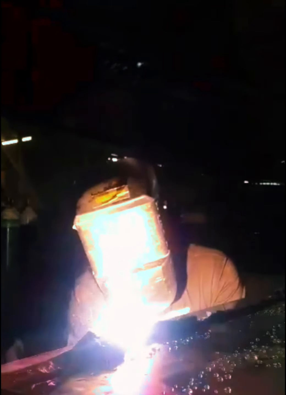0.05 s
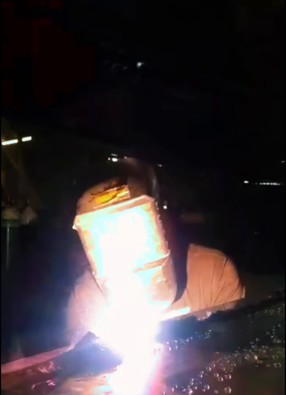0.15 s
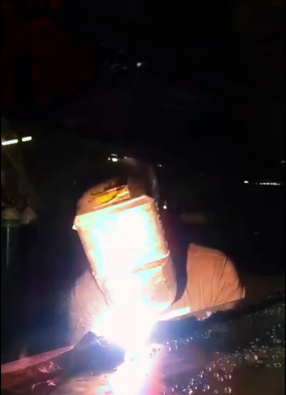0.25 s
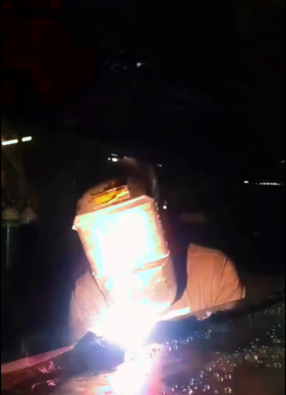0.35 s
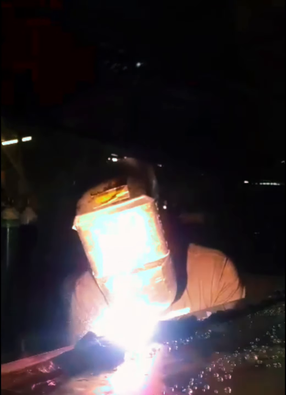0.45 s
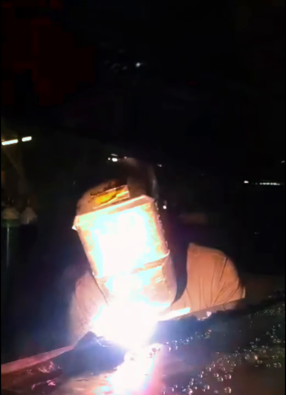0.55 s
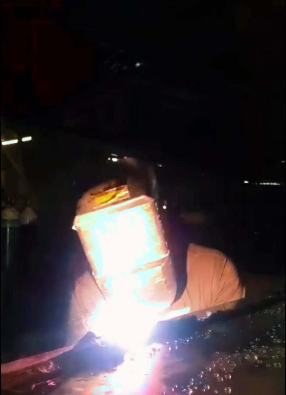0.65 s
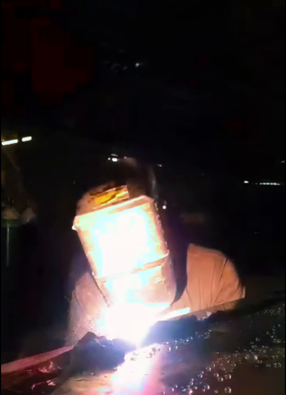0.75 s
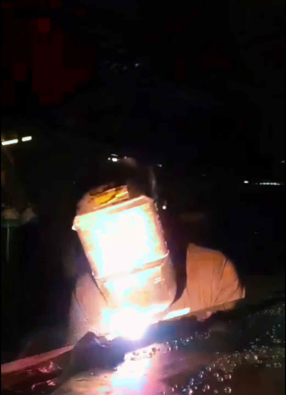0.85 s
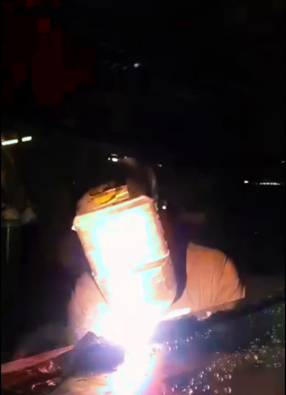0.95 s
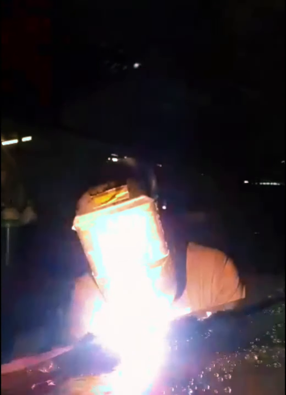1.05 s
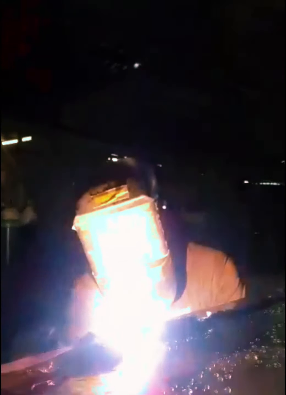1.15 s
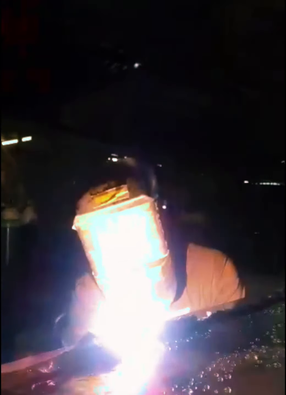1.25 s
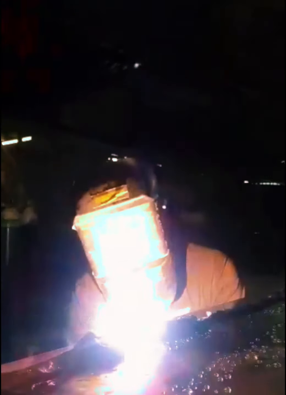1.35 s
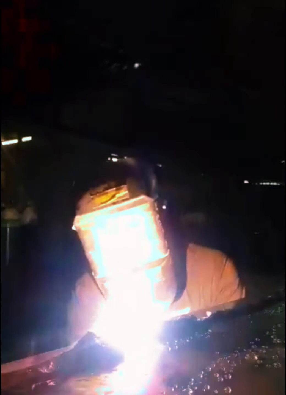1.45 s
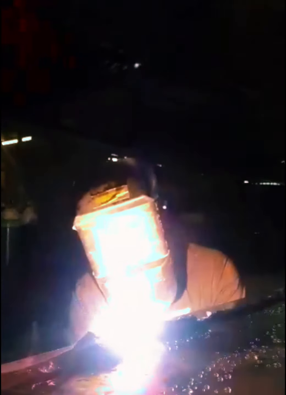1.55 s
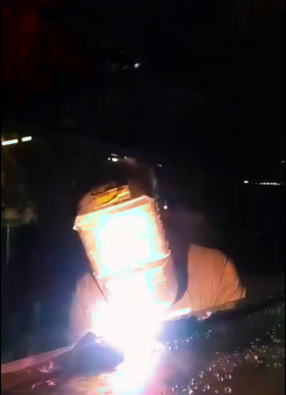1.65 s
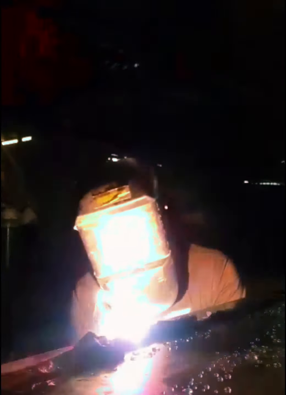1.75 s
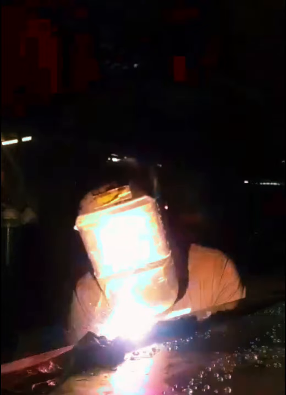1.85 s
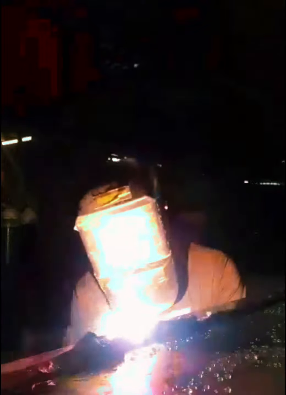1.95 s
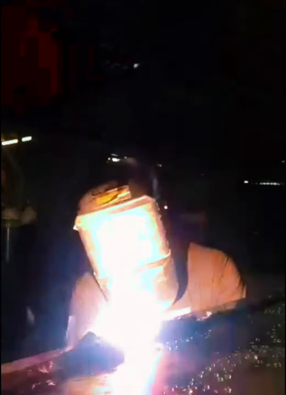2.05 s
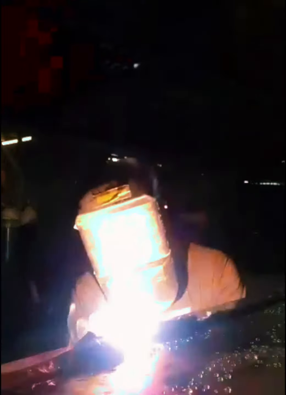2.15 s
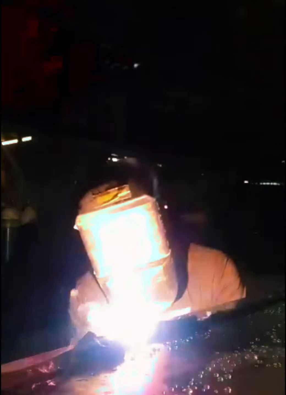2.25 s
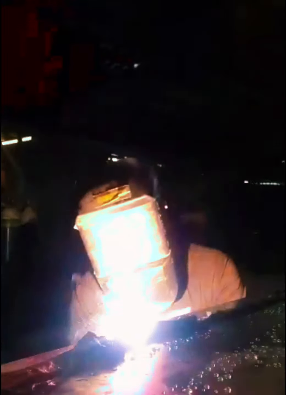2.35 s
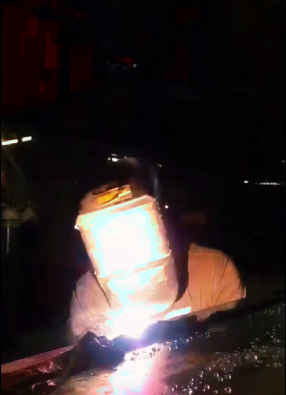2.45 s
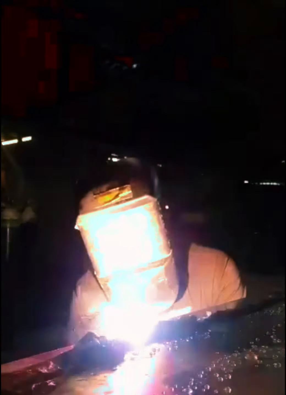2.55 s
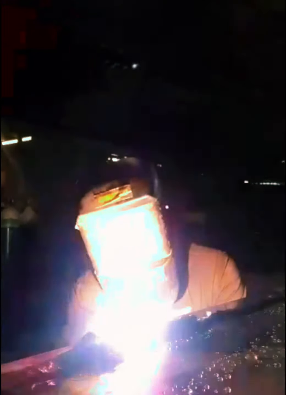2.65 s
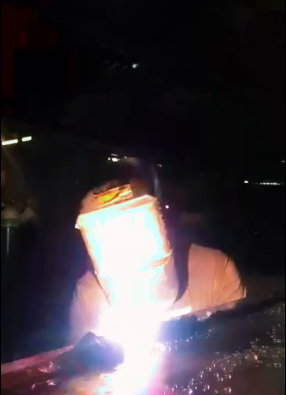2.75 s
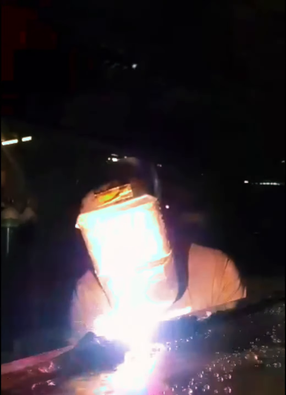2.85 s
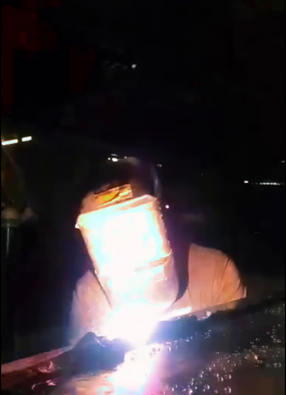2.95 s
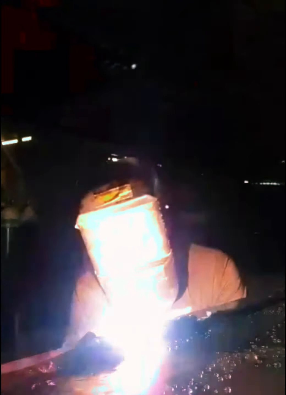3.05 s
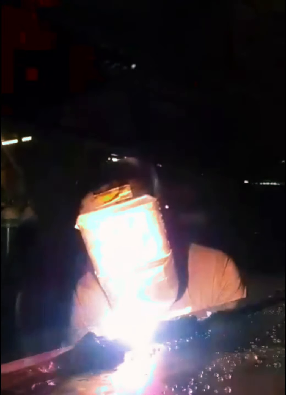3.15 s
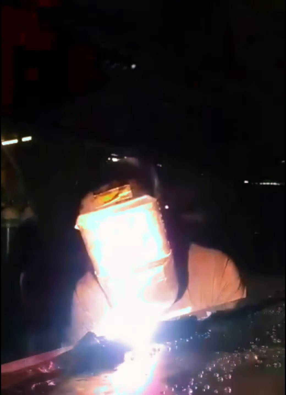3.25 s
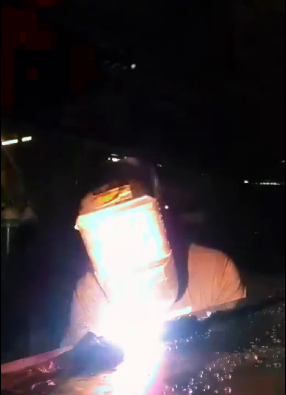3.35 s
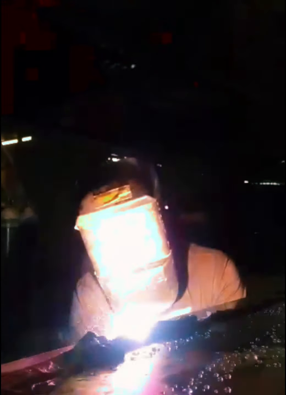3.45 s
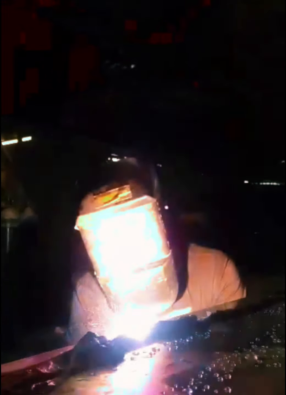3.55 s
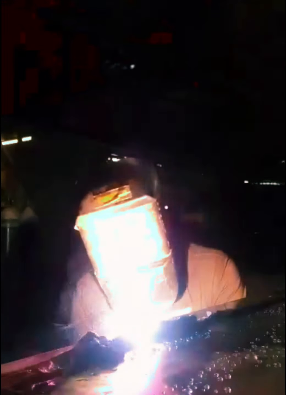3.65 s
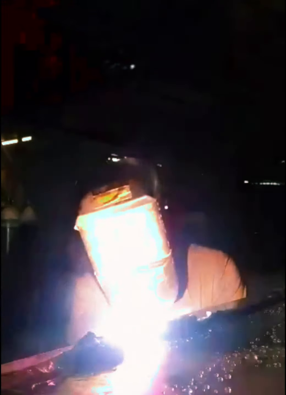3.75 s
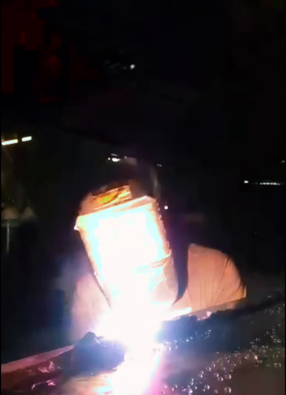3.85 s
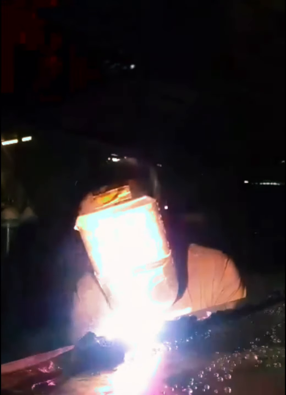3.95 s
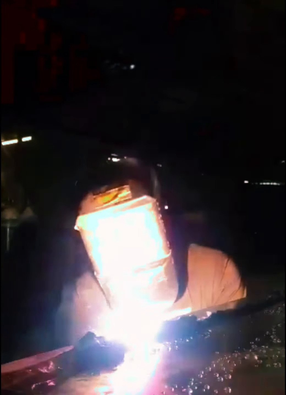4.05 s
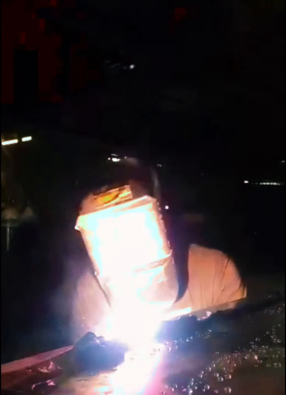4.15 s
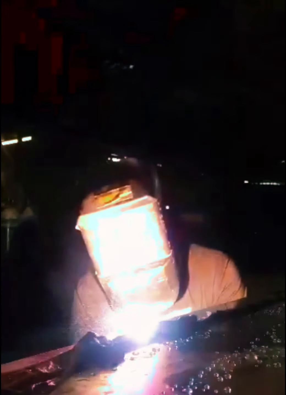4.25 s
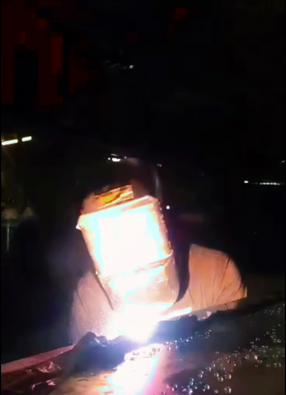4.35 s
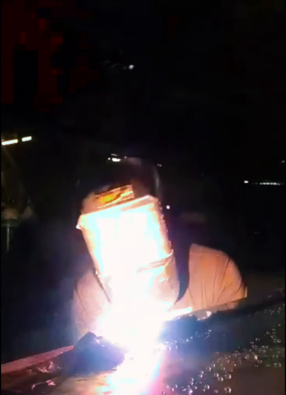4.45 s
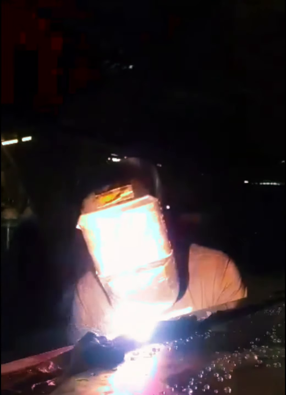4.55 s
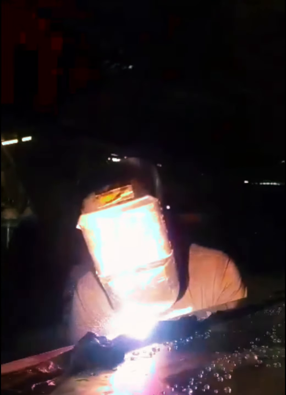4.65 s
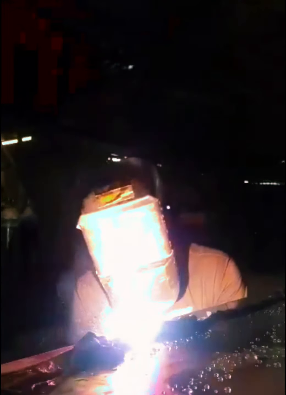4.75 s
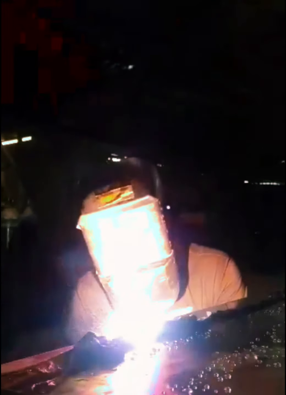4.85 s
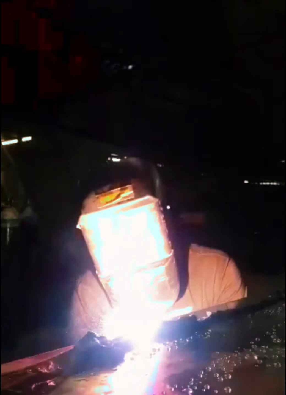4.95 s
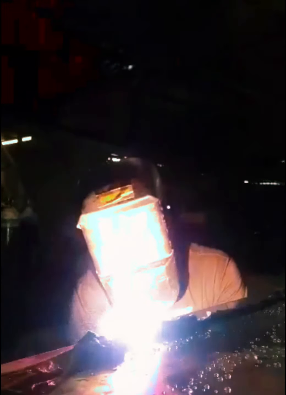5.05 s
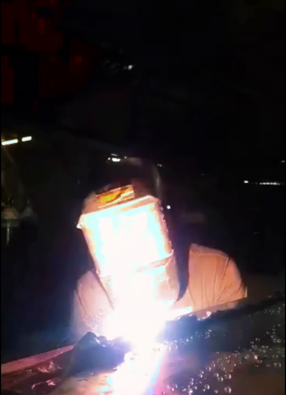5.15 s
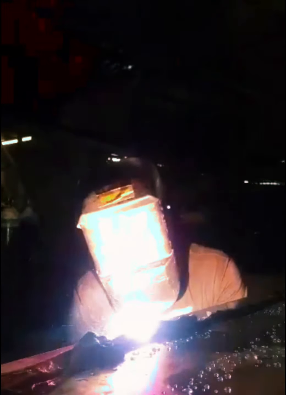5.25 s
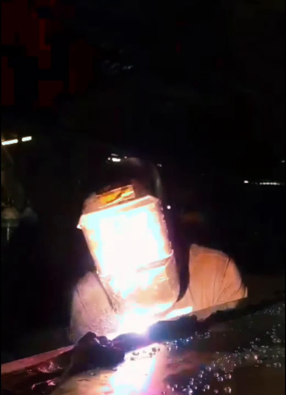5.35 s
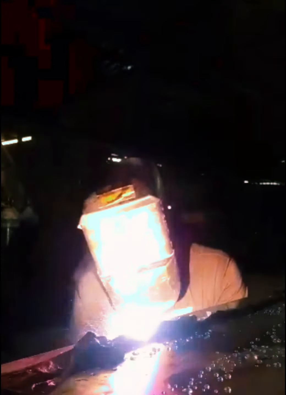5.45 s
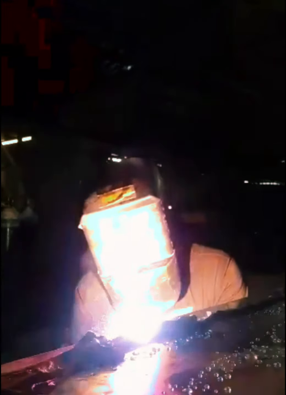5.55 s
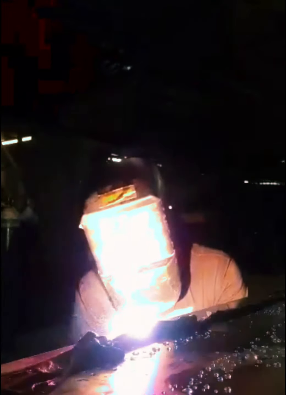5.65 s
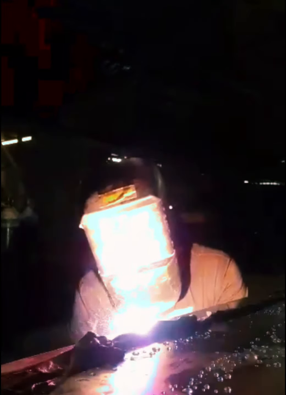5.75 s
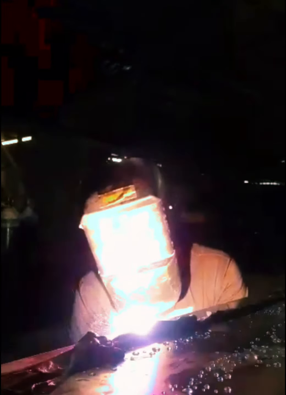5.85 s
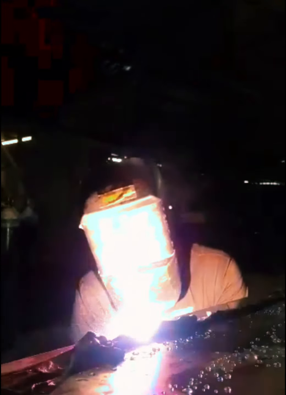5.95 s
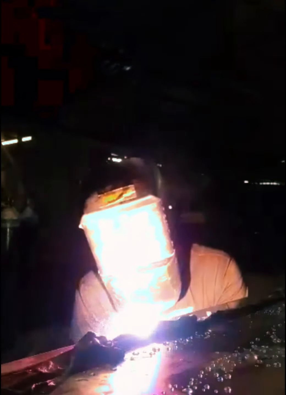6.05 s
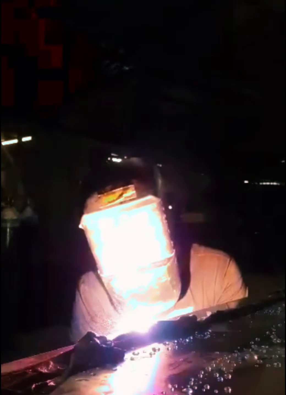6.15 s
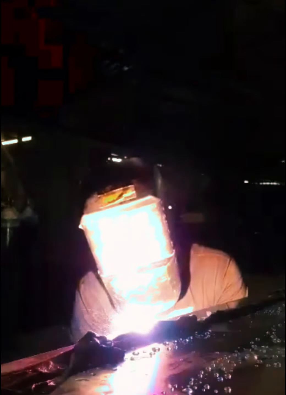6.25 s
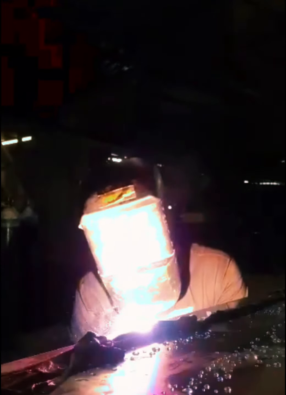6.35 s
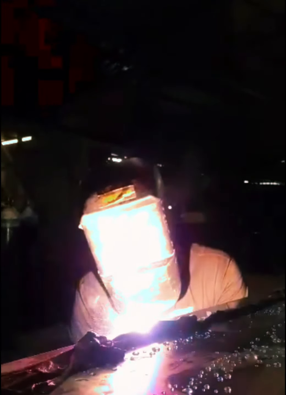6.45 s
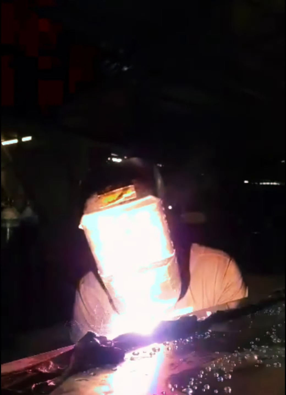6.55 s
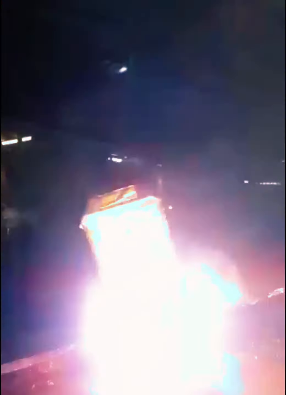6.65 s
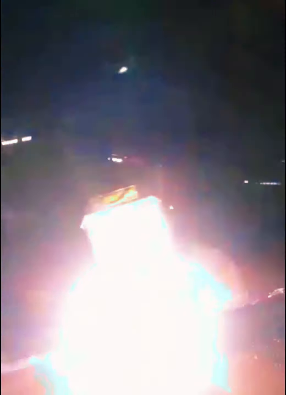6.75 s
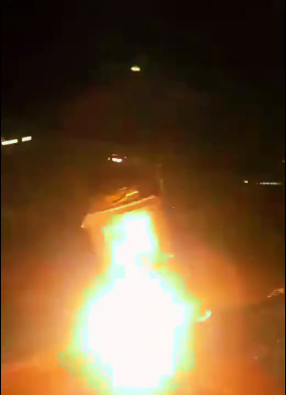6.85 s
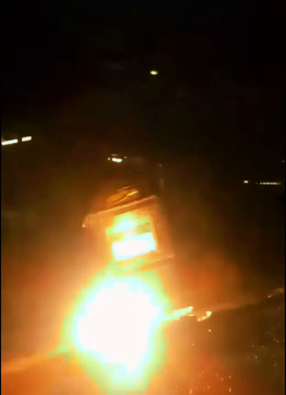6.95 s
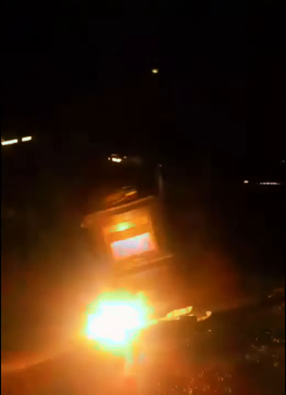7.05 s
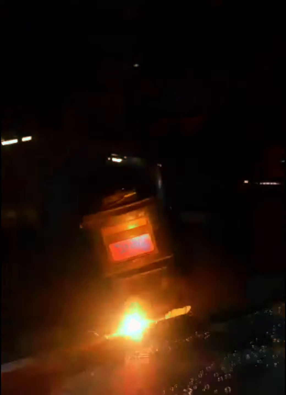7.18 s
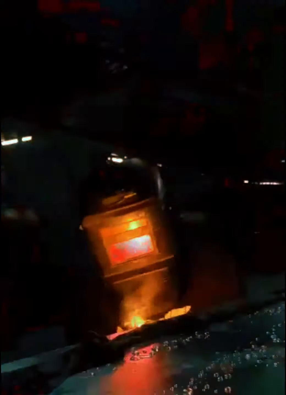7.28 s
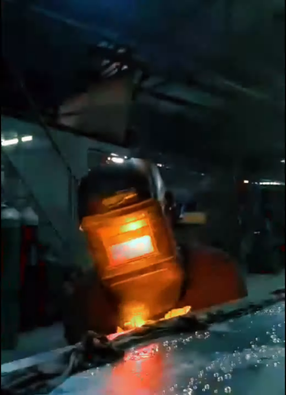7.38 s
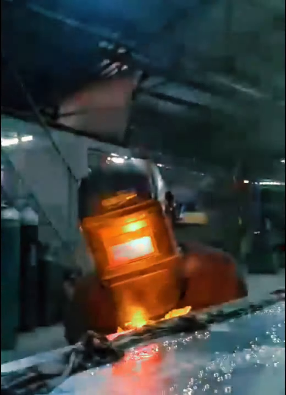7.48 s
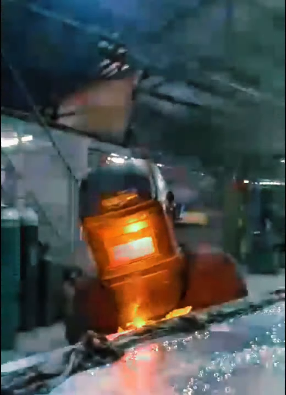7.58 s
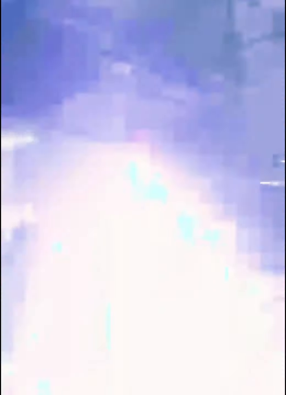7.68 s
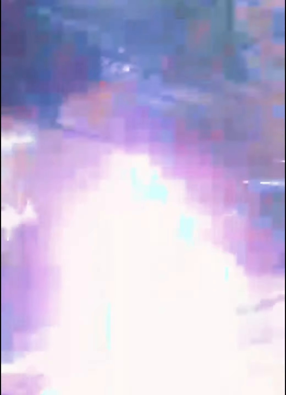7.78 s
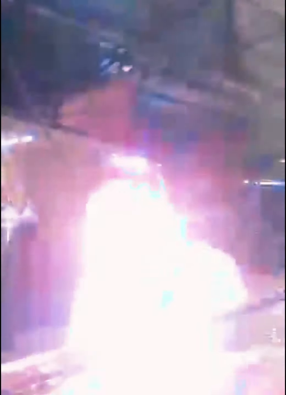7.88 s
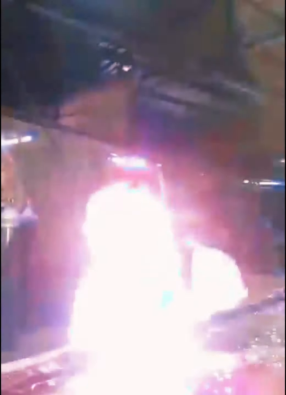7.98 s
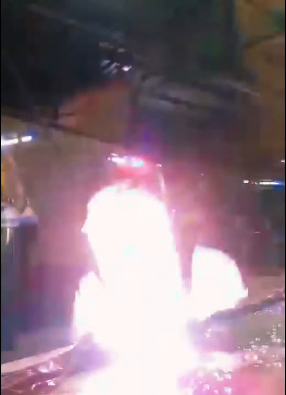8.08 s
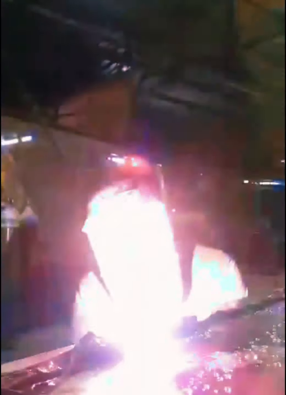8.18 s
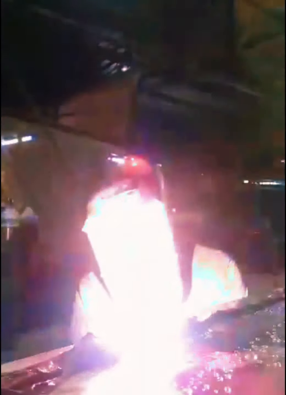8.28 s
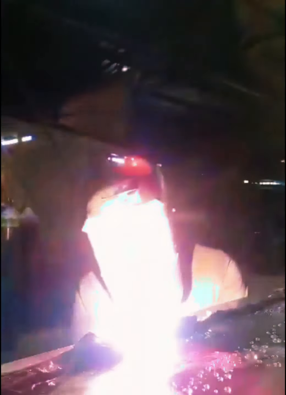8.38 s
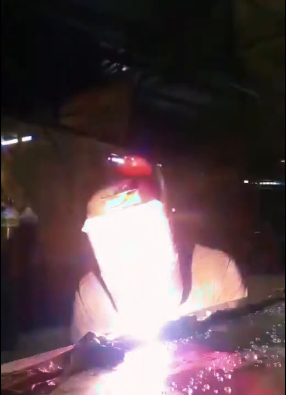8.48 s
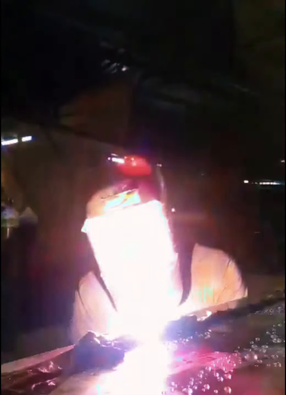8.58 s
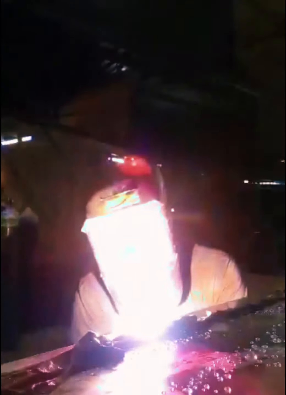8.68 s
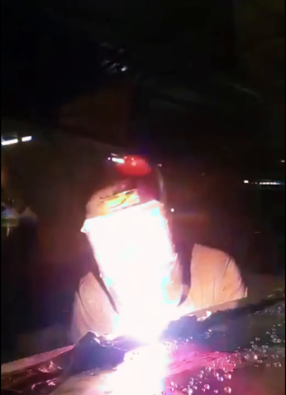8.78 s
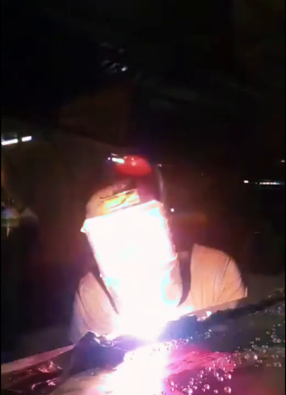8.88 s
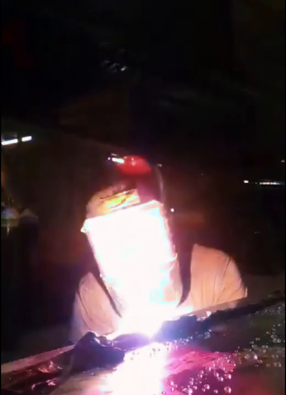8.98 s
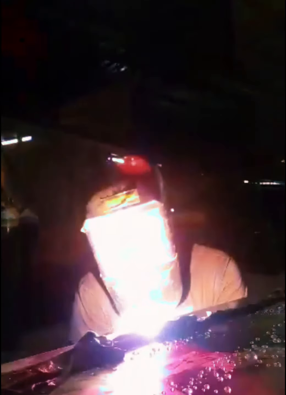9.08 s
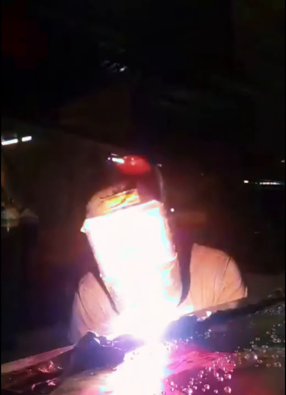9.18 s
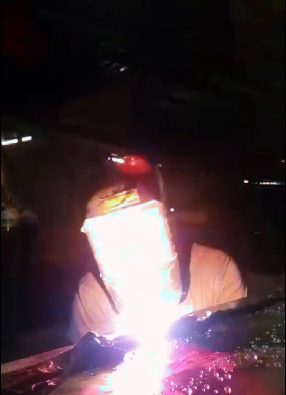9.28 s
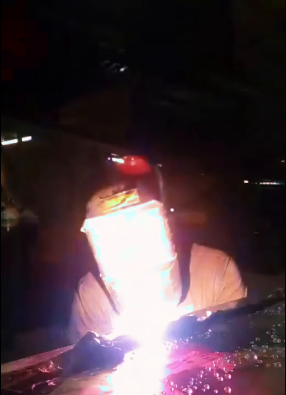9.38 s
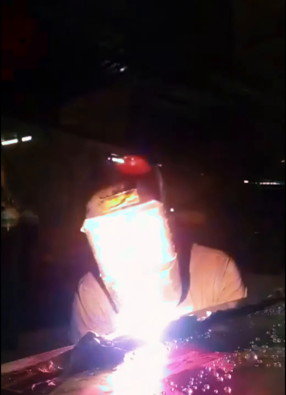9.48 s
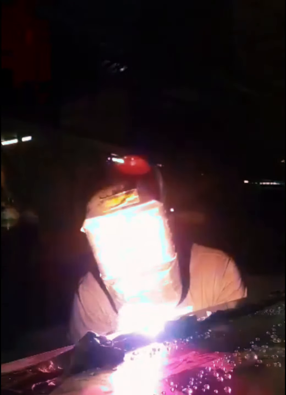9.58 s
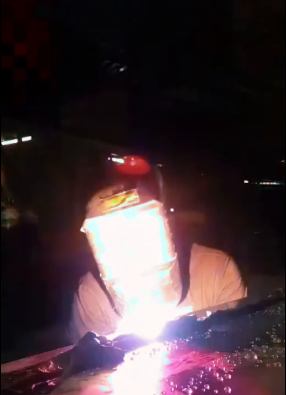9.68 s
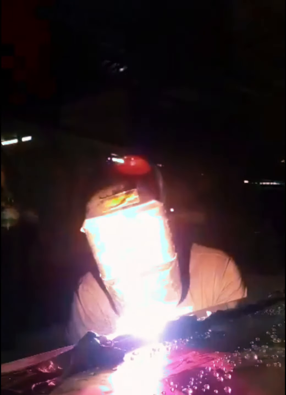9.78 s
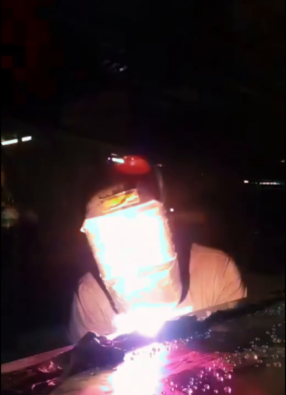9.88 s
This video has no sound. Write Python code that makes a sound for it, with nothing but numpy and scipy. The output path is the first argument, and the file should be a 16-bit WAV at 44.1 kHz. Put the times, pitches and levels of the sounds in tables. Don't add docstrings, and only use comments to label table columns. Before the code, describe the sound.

A welding arc buzzes harshly and sizzles up close in a metal workshop, cuts out briefly to hissing gas and ticks, then snaps back alight.

```python
import sys
import numpy as np
from scipy import signal
from scipy.fft import rfft, irfft, next_fast_len
from scipy.io import wavfile
from scipy.ndimage import uniform_filter1d, map_coordinates

SR = 44100
rng = np.random.default_rng(int(sys.argv[2]) if len(sys.argv) > 2 else 0)


def level_to_linear(level):
    exponent = np.asarray(level, float) / 20
    return 10 ** exponent


def bounce(signal):
    frames = np.transpose(np.atleast_2d(signal))
    limited = np.clip(frames, -1, 1)
    pcm = np.round(limited * 32767).astype(np.int16)
    wavfile.write(sys.argv[1], SR, pcm)


N = 437472
TIME_S = np.arange(N) / SR

# (start [s], end [s])
ALIGHT = [
    (-1, 6.9545),
    (7.7765, 10),
]
CYCLE_HZ, FIRST_REVERSAL_S, SHORT_HALF_S = 66.628, .002347, .00422


def unit(x):
    return x / np.sqrt(np.mean(x ** 2) + 1e-20)


def along(points, hz):
    f, db = np.transpose(points)
    log_f = np.log([f[0] / 2, *f, f[-1] * 2])
    return np.interp(np.log(hz + 1), log_f, [db[0] - 40, *db, db[-1] - 40])


def curves(rows):
    s, *cols = np.transpose(rows)
    return [np.interp(TIME_S, s, col) for col in cols]


def wobble(rate_hz):
    knots = rng.standard_normal(int(N * rate_hz / SR) + 4)
    return map_coordinates(knots, [TIME_S * rate_hz])


def filtered(x, response):
    m = next_fast_len(N + SR // 2)
    return irfft(rfft(x, m) * response(np.fft.rfftfreq(m, 1 / SR)), m)[..., :N]


def hiss(spectrum, channels=()):
    white = rng.standard_normal((*channels, N))
    return unit(filtered(white, lambda hz: level_to_linear(along(spectrum, hz))))


def patchy(x, patchy_db):
    z = signal.stft(x, nperseg=512)[2]
    field = uniform_filter1d(rng.standard_normal(z.shape), size=8, axis=-2)
    field = uniform_filter1d(field, size=10, axis=-1)
    return unit(signal.istft(z * level_to_linear(patchy_db * unit(field)), nperseg=512)[1][..., :N])


def snaps(times_s, sizes, spectrum):
    shape = np.roll(irfft(level_to_linear(along(spectrum, np.fft.rfftfreq(1024, 1 / SR)))), 512)
    at = np.floor(times_s * SR)[:, None] + np.arange(-7, 9)
    off = at - times_s[:, None] * SR
    taps = sizes[:, None] * np.sinc(off) * np.cos(np.pi * off / 16) ** 2
    train = np.bincount(np.clip(at, 0, N).astype(int).ravel(), taps.ravel(), N + 1)[:N]
    return signal.fftconvolve(train, shape / abs(shape).max())[512:N + 512]


def arc():
    # (time [s], strength [dB], arc stretch [0 usual, 1 long])
    burn = [(0, -19.5, -0.036), (.77, -19.5, -0.33), (.89, -20.5, 0.18), (.94, -23, 0.4),
            (1.06, -21.5, -0.54), (1.82, -21, -0.49), (1.96, -21, 0.46), (2.1, -20.5, -0.076),
            (4.5, -20, -0.07), (5.5, -21.5, -0.43), (6.0, -20, 0.043), (6.62, -20, -0.17),
            (6.76, -21.5, 1.5), (6.87, -18.5, 1.3), (6.95, -20.5, 1.2), (7.78, -20.5, 0.4),
            (7.86, -21.5, -0.33), (9.92, -19.5, -0.12)]
    catch_s = 0.0067
    strength_db, stretch = curves(burn)
    strength_db = strength_db + 0.12 * wobble(13)
    roar_db = strength_db - 9 - 4 * stretch + 0.5 * wobble(20)
    fizz_db = strength_db - 11 + 3 * stretch + 0.5 * wobble(15)
    short, mood = half_waves()
    flame = level_to_linear(roar_db) * roar(short, mood, stretch)
    flame += level_to_linear(strength_db - 2.5) * sizzle(short, mood)
    flame += level_to_linear(strength_db + 13) * reversals()
    alight = sum((TIME_S < end) * (1 - np.exp(-np.clip(TIME_S - start, 0, None) / catch_s))
                 for start, end in ALIGHT)
    return alight * flame, alight * level_to_linear(fizz_db) * fizz(short)


def half_waves():
    cycle = (TIME_S - FIRST_REVERSAL_S) * CYCLE_HZ
    short = uniform_filter1d(1. * (cycle % 1 < SHORT_HALF_S * CYCLE_HZ), size=9)
    chance = rng.standard_normal(int(cycle[-1]) + 2)
    return short, chance[np.floor(cycle).astype(int)]


def roar(short, mood, stretch):
    # (frequency [Hz], density [dB per Hz])
    roar_spectrum = [(500, -34), (800, -10.5), (1050, -6), (1300, -1), (1600, 2), (2500, -2.5), (4000, -22),
                     (7400, -11), (7900, -41)]
    gate = short * level_to_linear(1.9 * mood) + level_to_linear(-16 + 6 * stretch)
    return unit(gate * level_to_linear(1.3 * wobble(900)) * hiss(roar_spectrum))


def sizzle(short, mood):
    # (frequency [Hz], density [dB per Hz])
    sizzle_spectrum = [(900, -46), (2000, -12), (3500, 2.5), (5000, -2.5), (6500, 0.5), (7400, -1),
                       (7900, -13.5)]
    gate = short * level_to_linear(2.95 * mood) + level_to_linear(-2)
    return unit(gate * patchy(hiss(sizzle_spectrum), patchy_db=2.0))


def reversals():
    # (frequency [Hz], level [dB])
    strike_spectrum = [(500, -25), (800, -10), (2000, -5), (4000, 0), (5000, -3), (6500, -11), (9000, -22),
                       (13000, -26)]
    # (frequency [Hz], level [dB])
    quench_spectrum = [(500, -28), (800, -13), (2000, -9), (4500, 0), (6300, 0), (7400, -4), (9000, -15),
                       (13000, -18)]
    count = int((TIME_S[-1] - FIRST_REVERSAL_S) * CYCLE_HZ) + 1
    starts_s = FIRST_REVERSAL_S + np.arange(count) / CYCLE_HZ
    strike_jitter, strike_size, quench_jitter, quench_size = rng.standard_normal((4, count))
    strike_s = starts_s + 4e-5 + 1e-5 * strike_jitter
    quench_s = starts_s + SHORT_HALF_S + 5e-5 + 6e-6 * quench_jitter
    strike = snaps(strike_s, level_to_linear(-3.5 + 2.5 * strike_size), strike_spectrum)
    quench = snaps(quench_s, level_to_linear(2 * quench_size), quench_spectrum)
    return strike + quench


def fizz(short):
    # (frequency [Hz], density [dB per Hz])
    fizz_spectrum = [(7400, -25), (8000, -1), (9000, -1), (10500, -1), (12000, 0), (13000, -5)]
    # (time [s], lag between ports [ms], scattered part [dB], extra path off the plate [ms])
    plume = [(0, 0.073, -2.5, 1.54), (4, 0.057, -1.5, 1.4), (5, 0.065, -2.5, 1.26), (7, 0.062, -1.5, 1.1),
             (7.7, 0.062, -2.5, 1.255), (9.92, .057, -0.5, 1.255)]
    core, *spread = (short + level_to_linear(3.5)) * patchy(hiss(fizz_spectrum, channels=(3,)), patchy_db=4.5)
    lag_ms, spread_db, echo_ms = curves(plume)
    lag_ms = lag_ms + .005 * wobble(7)
    spread_db = spread_db + 2.5 * wobble(10)

    def late(ms):
        return map_coordinates(core, [(TIME_S - ms / 1000) * SR], order=3)

    ports = np.array([late(ms) + late(ms + echo_ms) for ms in (lag_ms, 0)])
    return unit(ports + level_to_linear(spread_db) * np.array(spread))


def ticks():
    tick_events = [(7.0894, -15, 0.012), (7.149, -15, 0.012), (7.1644, -18, 0.012), (7.2587, -17, 0.015),
                   (7.302, -11, 0.01), (7.388, -17, 0.019), (7.4402, -17, 0.014), (7.505, -16, 0.012),
                   (7.529, -21, 0.012), (7.6494, -39, 0.011), (7.7617, -30, 0.014), (7.763, -5, 0.017),
                   (7.7716, -8, 0.012)]
    x, t = np.zeros(N + SR), np.arange(SR // 10) / SR
    for s, db, t60_s in tick_events:
        decay_db = db - 15 - 60 * t / max(t60_s, .002)
        x[round(s * SR):][:len(t)] += level_to_linear(decay_db) * rng.standard_normal(len(t))
    return filtered(x[:N], lambda hz: (1j * hz / (900 + 1j * hz)) ** 2)


def paths(x):
    # (time [s], extra path off the plate [ms])
    plate = [(0, 1.34), (2, 1.327), (4.5, 1.307), (6.9, 1.29), (7.8, 1.243), (9.92, 1.18)]
    # (direct share, lag [ms])
    ports = [(0.95, -0.0087), (0.63, -0.1)]
    # (delay after the plate path [ms], signed share)
    bounces = [
        [(0, .45), (.09, -0.46), (.23, -0.37), (.67, -0.26), (1.03, 0.19)],
        [(-.08, 0.086), (.055, -1.01), (.21, -0.5), (.36, -.35), (1.42, 0.58)],
    ]
    plate_ms, = curves(plate)
    plate_ms = plate_ms + 0.005 * wobble(8)
    off_plate = map_coordinates(x, [np.arange(N) - plate_ms * SR / 1000], order=3)

    def taps(rows):
        return lambda hz: sum(share * np.exp(-2j * np.pi * hz * ms / 1000) for ms, share in rows)

    return np.array([filtered(x, taps([(lag_ms, share)])) + filtered(off_plate, taps(rows))
                     for (share, lag_ms), rows in zip(ports, bounces)])


def hall(x):
    # (frequency [Hz], t60 [s])
    hall_decay = [(500, 0.14), (2000, 0.36), (6000, 0.21), (12000, 0.11)]
    decay_hz, decay_s = np.transpose(hall_decay)
    out, step = np.zeros((2, N + 2 * SR)), SR // 4
    for at in range(0, N, step):
        hz, t, z = signal.stft(rng.standard_normal((2, SR // 2)), SR, nperseg=256)
        t60_s = np.interp(np.log(hz + 1), np.log(decay_hz), decay_s)
        tail = signal.istft(z * level_to_linear(-60 * t / t60_s[:, None]), SR, nperseg=256)[1]
        wet = signal.fftconvolve(x[None, at:at + step], tail / np.linalg.norm(tail[0]), axes=1)
        out[:, at + 90:][:, :wet.shape[1]] += wet
    return out[:, :N]


def gas():
    # (frequency [Hz], density [dB per Hz])
    nozzle = [(600, 7), (692, -4.5), (1420, 4.5), (3800, 9), (5500, 3), (7610, 9), (8450, -5.5),
              (12500, 0.5)]
    surge_db, settle_s = 9.5, 0.19
    since_out_s = np.clip(TIME_S - ALIGHT[0][1], 0, None)
    gas_db = -41.5 + surge_db * np.exp(-since_out_s / settle_s)
    return level_to_linear(gas_db + 1.1 * wobble(30)) * patchy(hiss(nozzle, channels=(2,)), patchy_db=1.5)


def fan():
    # (frequency [Hz], density [dB per Hz])
    rumble = [(60, -17), (150, 2), (300, 3), (400, -17), (520, 7), (560, 9), (610, -6), (800, -5)]
    # (time [s], frequency [Hz])
    drone_note = [(6.95, 201), (7.08, 247), (7.16, 209), (7.38, 197), (7.5, 214.4), (7.75, 219)]
    drone_hz, = curves(drone_note)
    drone = np.sqrt(2) * np.sin(2 * np.pi * np.cumsum(drone_hz + 4 * wobble(25)) / SR)
    x = level_to_linear(-58 + 2.5 * wobble(15)) * drone + level_to_linear(-60) * hiss(rumble)
    return x * level_to_linear(np.interp(TIME_S, [6, 7, 7.76, 8.3], [-9.5, -2, 0.5, -13]))


def scene():
    flame, plume_fizz = arc()
    torch = flame + ticks()
    return paths(torch) + level_to_linear(-3.5) * hall(torch) + plume_fizz + gas() + fan()


def band_limit(x):
    return signal.sosfilt(signal.butter(12, 14200, fs=SR, output="sos"), x)


def record(dry):
    cross = filtered(dry[::-1], lambda hz: np.exp(-2j * np.pi * hz * 0.00028) / (1 + (hz / 8000) ** 8))
    wide = dry - 0.33 * cross
    bent = dry * (0.18 * dry + 0.45 * rng.standard_normal(dry.shape)) * level_to_linear([[-19], [-12]])
    buzz = filtered(bent, lambda hz: 1 / (1 + (hz / 300) ** 2) + 1.85 / (1 + ((hz - 130) / 35) ** 2))
    x = wide + buzz
    x = x / (1 + abs(x / .98) ** 10) ** (1 / 10)
    x = filtered(x, lambda hz: (hz < 13100) * hz / np.hypot(hz, 130))
    return band_limit(x)


dry = scene()
out = record(dry)
bounce(out)
```